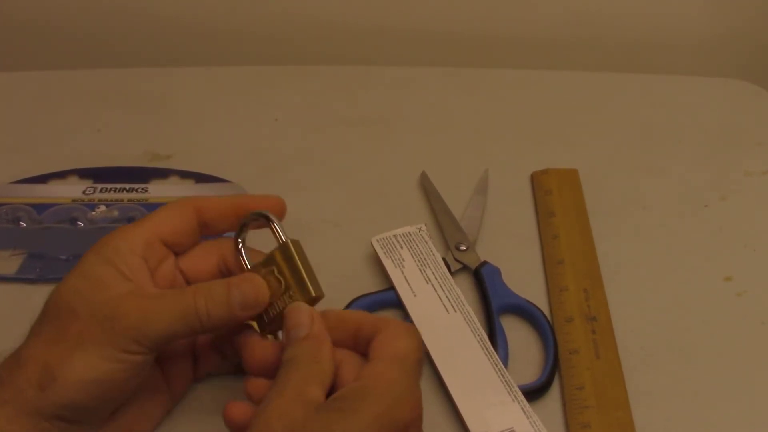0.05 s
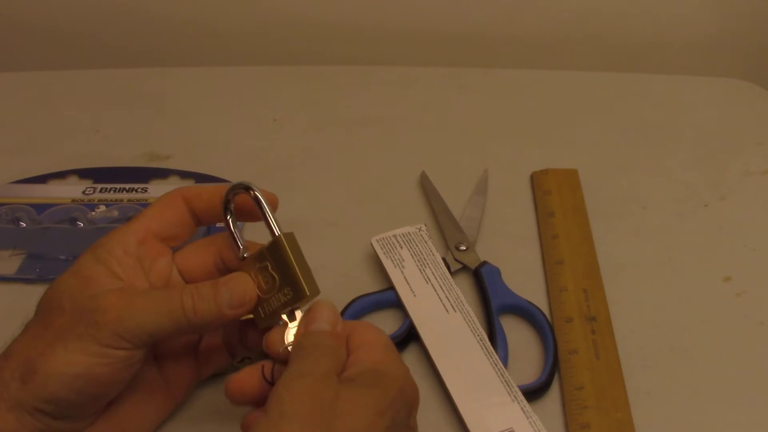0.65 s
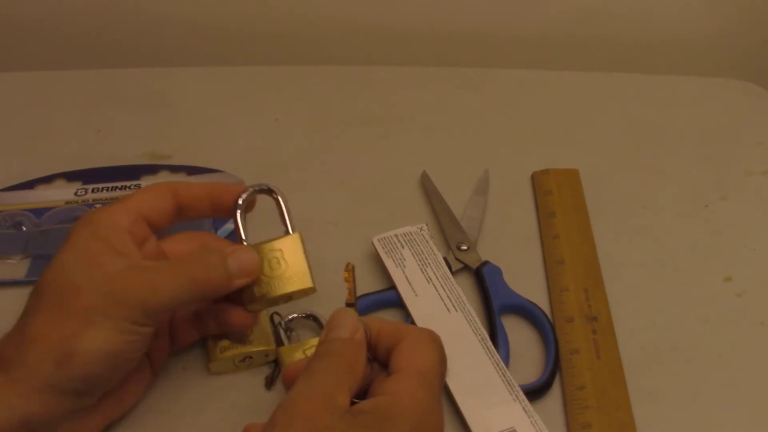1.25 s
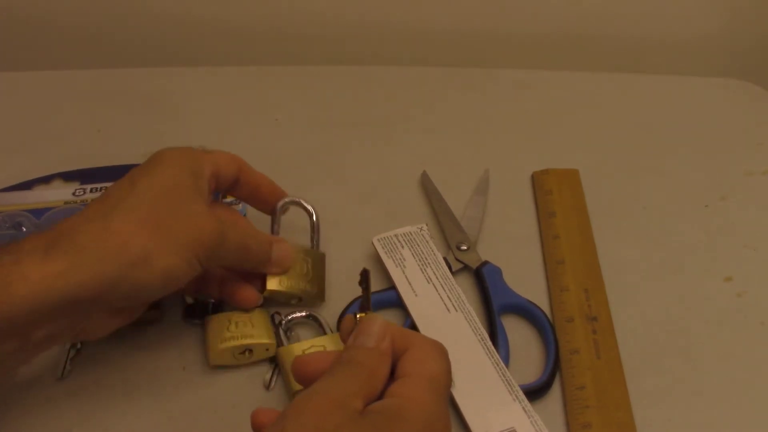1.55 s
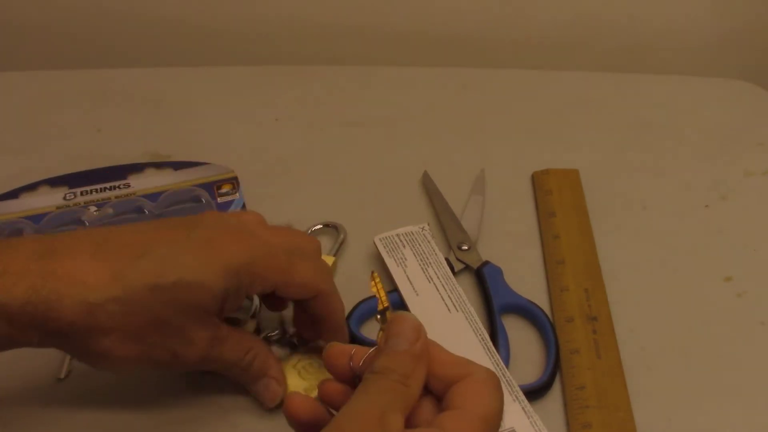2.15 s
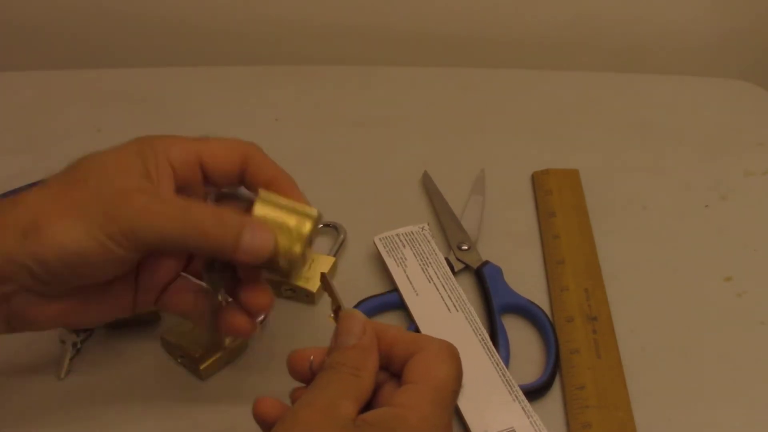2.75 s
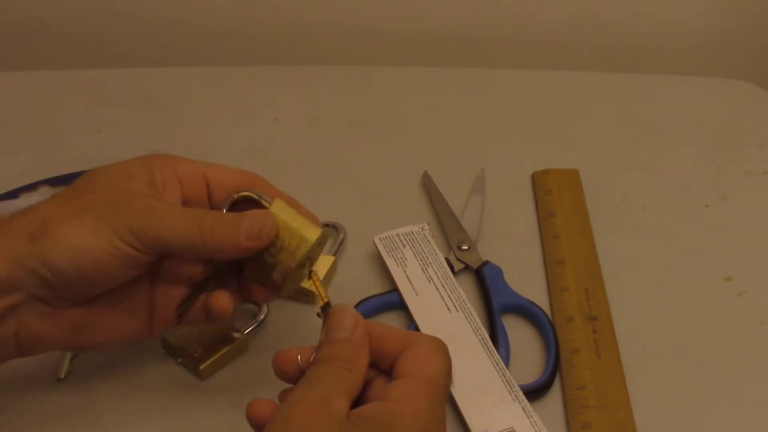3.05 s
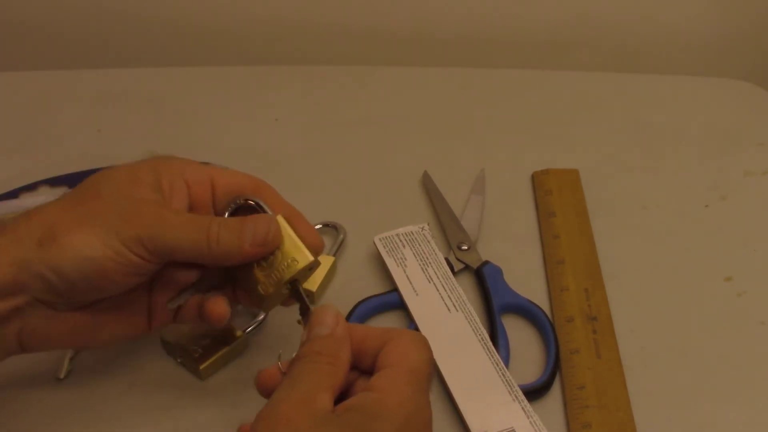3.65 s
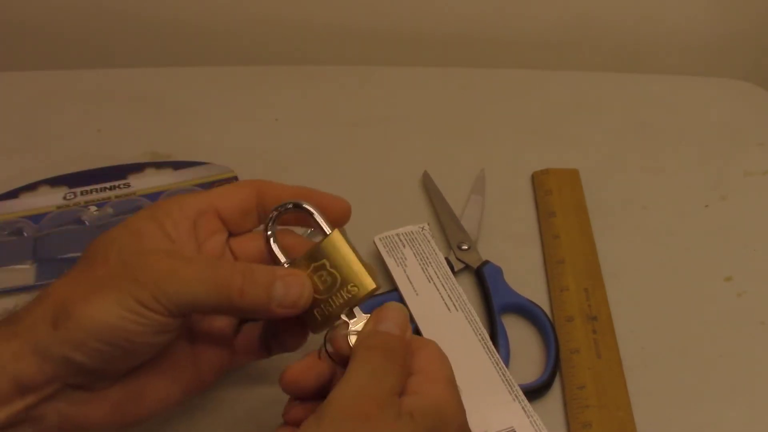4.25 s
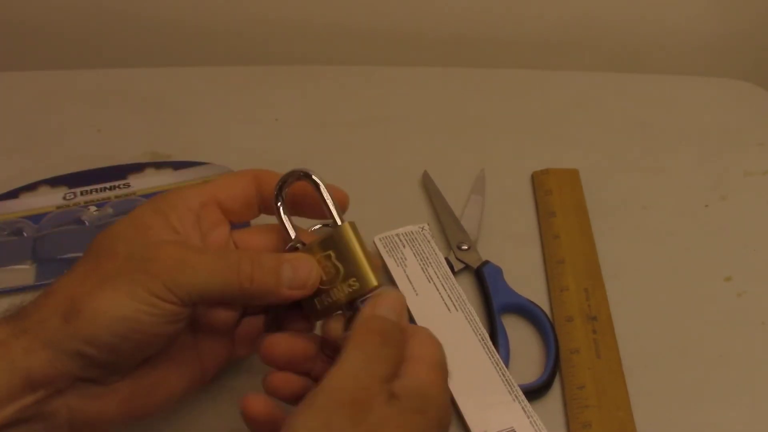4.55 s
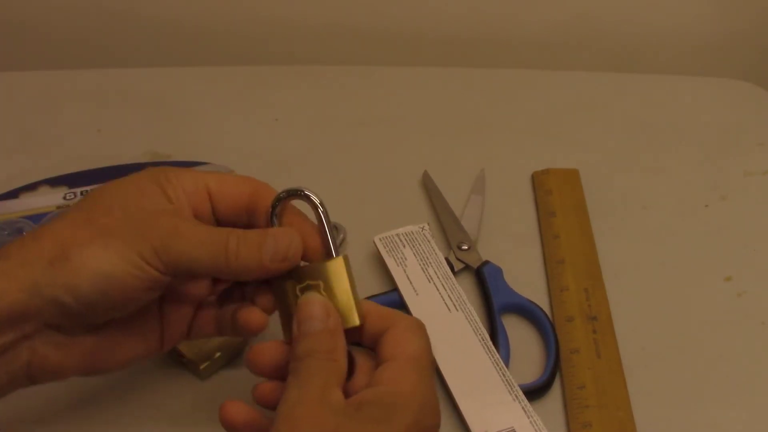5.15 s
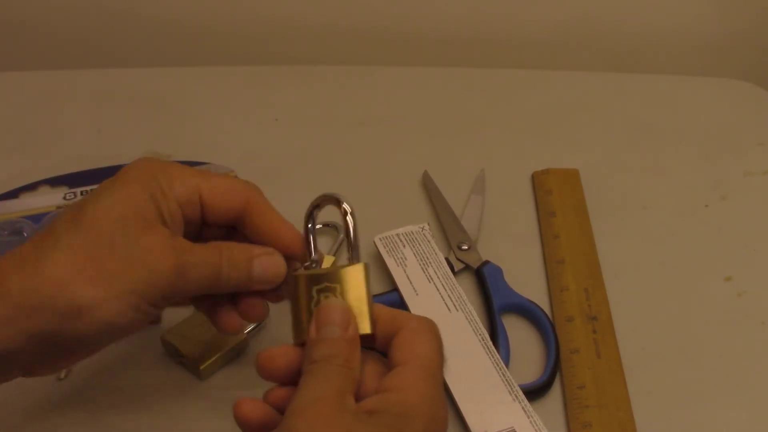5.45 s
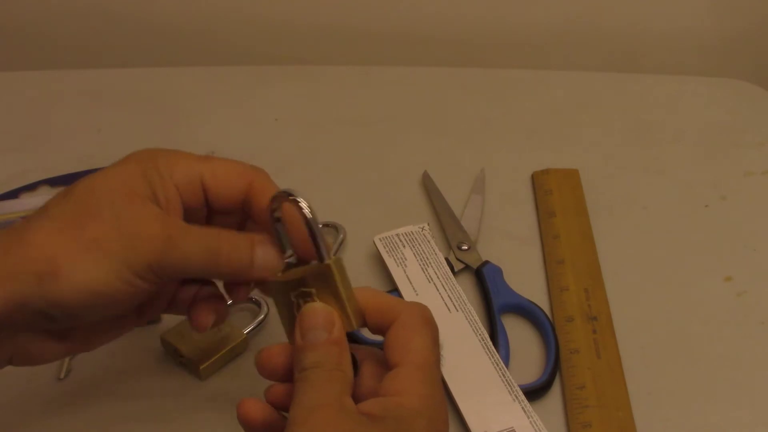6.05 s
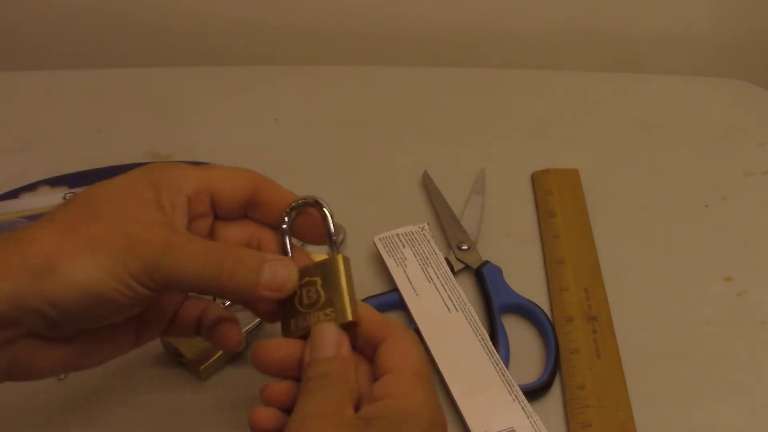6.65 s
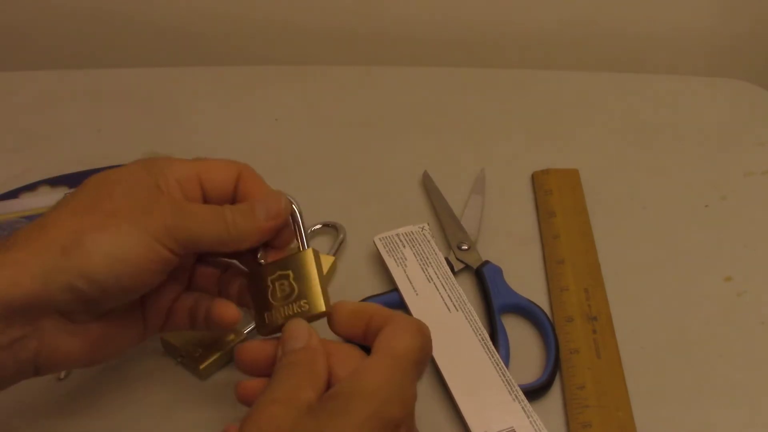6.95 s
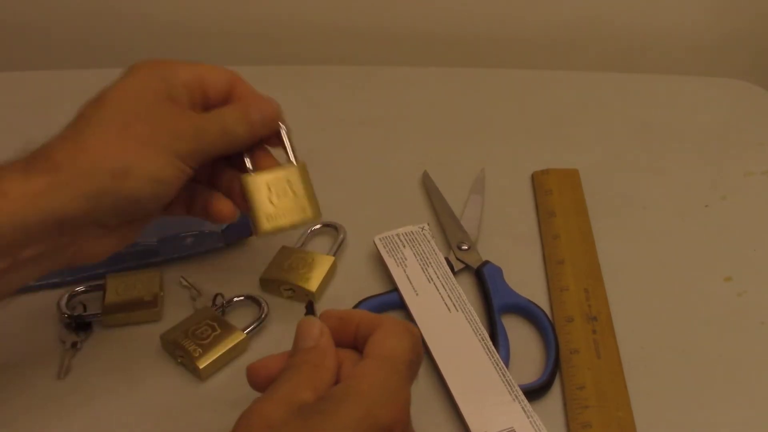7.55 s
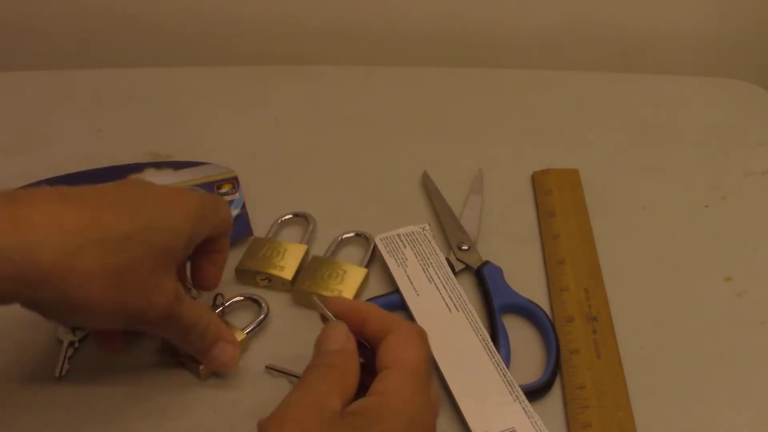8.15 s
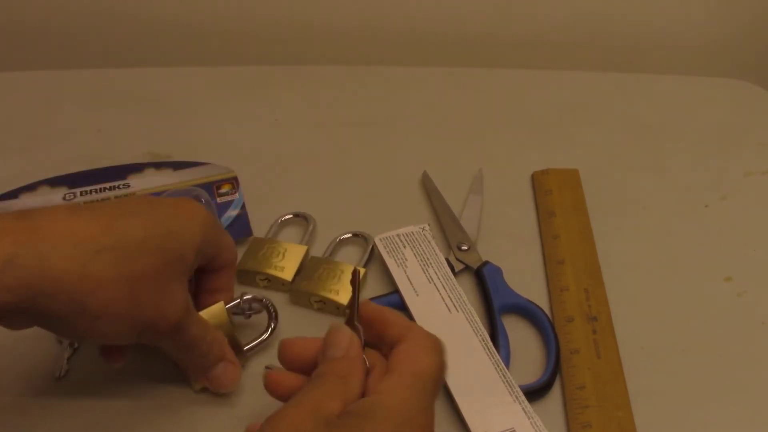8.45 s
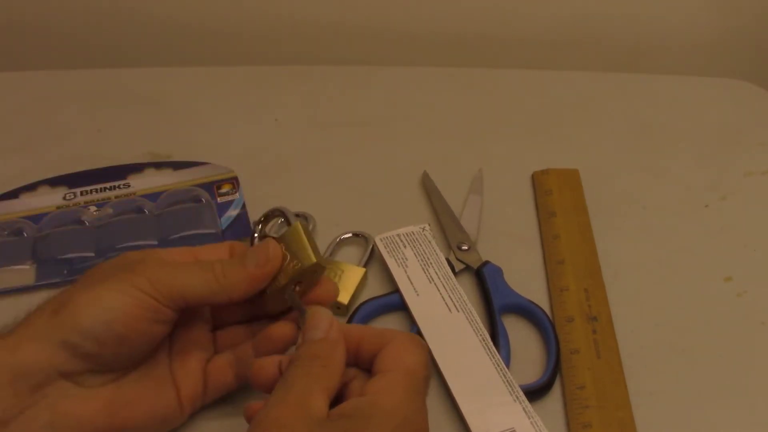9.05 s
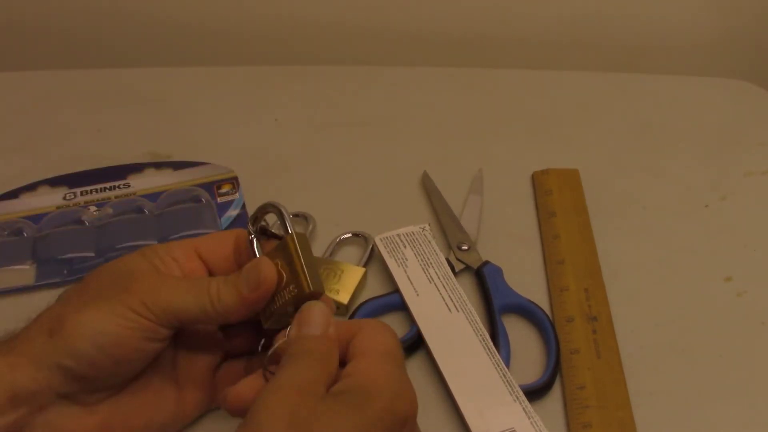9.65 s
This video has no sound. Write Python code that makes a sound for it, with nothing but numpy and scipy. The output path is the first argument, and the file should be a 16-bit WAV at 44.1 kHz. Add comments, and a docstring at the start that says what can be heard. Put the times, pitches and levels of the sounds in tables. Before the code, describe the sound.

Small brass padlocks and keys click, rasp and jingle in the hands, and clatter down on a hollow plastic table in a quiet room.

```python
"""Small brass padlocks are handled over a hollow plastic table, close to the microphone in a quiet room.
Shackles (the locks' loops) snap open and shut, and keys rasp in and out past the pins inside.
Locks are put down, rock to rest and are dragged, which makes the table top boom and clatter.
Fingers rub the brass, brass squeals once against steel, and the spare keys on the ring chime."""
import sys
import numpy as np
from scipy import signal
from scipy.io import wavfile
from scipy.ndimage import uniform_filter1d

SR = 44100
rng = np.random.default_rng(int(sys.argv[2]) if len(sys.argv) > 2 else 0)


def generate_wav(signal):
    """Clip the signal to [-1, 1] and save it as 16-bit WAV at the path in sys.argv[1]."""
    frames = np.transpose(np.atleast_2d(signal))
    scaled = np.clip(frames, -1, 1) * 32767
    pcm = np.round(scaled).astype(np.int16)
    wavfile.write(sys.argv[1], SR, pcm)


N = 436149
TIME = np.arange(N) / SR
BAND_EDGES_HZ = np.geomspace(28, 18000, 23)
BAND_HZ = np.sqrt(BAND_EDGES_HZ[1:] * BAND_EDGES_HZ[:-1])   # the middle of each band

# A key slides past the pins and clicks home. Each row: time of the click in seconds, click level in dB,
# seconds of rasp before it, seconds of rasp after it, rasp level in dB.
KEY_STROKES = [(.5137, 1, 0.011, 0.0035, -20.5), (0.7097, -50, 0.0017, 0.036, -44.5),
               (0.9609, -24, 0.011, 0.043, -33.5), (3.7797, -12.5, 0.036, 0.027, -32.5),
               (4.3624, 1, 0.014, 0.0033, -14.5), (4.5495, -24.5, 0.018, 0.039, -45),
               (4.7444, -23, 0.05, 0.035, -47.5), (5.43, -31.5, 0.0078, 0.013, -50),
               (6.0845, -28.5, 0.016, 0.055, -43), (7.3824, -20, 0.025, 0.015, -29),
               (9.348, -25.5, 0.023, 0.003, -37), (9.4656, -7, .017, 0.00088, -25.5),
               (9.7397, 3, .006, 0.0066, -9.5)]
# The tones at which the table top rings. Each row: pitch in Hz, level in dB.
TABLE_TONES = [(140, -14.5), (158, -10.5), (176, -8.5), (200, -13), (262, -18.5), (298, -1.5), (312, -1.5),
               (392, -12.5), (438, -1), (474, -5.5), (581, -14.5), (664, 0), (797, -2), (835, -7),
               (931, -18), (1001, -7), (1160, -14.5), (1330, -15), (1473, -14.5), (1743, -15.5), (1889, -8),
               (3438, -18), (3655, -17)]
# How long the table rings. Each row: frequency in Hz, seconds to fade by 60 dB (called "t60").
TABLE_T60 = [(100, 0.79), (300, 0.44), (700, 0.14), (1800, 0.19), (4800, 0.14), (13000, 0.19)]


def from_db(db):
    """Turn decibels into a factor to multiply a sound by."""
    return 10 ** (np.asarray(db) / 20)


def at_hz(rows, hz):
    """Read between rows of frequency and value, giving every octave equal room."""
    row_hz, values = np.transpose(rows)
    return np.interp(np.log(hz), np.log(row_hz), values)


def add(track, start_s, sound):
    """Mix a sound into a track at a given time."""
    at = int(round(start_s * SR))
    track[at:at + len(sound)] += sound[:N - at]


def highpass(sound, hz):
    """Turn down everything below a frequency."""
    return signal.sosfilt(signal.butter(2, hz, "high", fs=SR, output="sos"), sound + 1e-18)


def split_bands(pair):
    """Make one row for each frequency band, drawing on two signals in turn."""
    bands = []
    for k in range(len(BAND_HZ)):
        band = signal.butter(2, BAND_EDGES_HZ[k:k + 2], "band", fs=SR, output="sos")
        bands.append(signal.sosfilt(band, pair[k % 2] + 1e-18))
    return np.array(bands)


def band_gains(colour):
    """Band volumes that give white noise a tone colour at about the same power."""
    gains = from_db(at_hz(colour, BAND_HZ))
    return gains / np.sqrt(np.sum(gains ** 2 * np.diff(BAND_EDGES_HZ)) * 2 / SR)


def fade(t60, seconds):
    """Curves that die away, one for each t60."""
    return np.exp(-np.log(1000) * TIME[:int(seconds * SR)] / np.reshape(t60, (-1, 1)))


def ringing(tones, seconds):
    """One fading sine wave for each row of pitch in Hz, level in dB and t60."""
    hz, db, t60 = np.transpose(tones)
    waves = np.sin(2 * np.pi * hz[:, None] * TIME[:int(seconds * SR)])
    return from_db(db)[:, None] * fade(t60, seconds) * waves


def burst(noise, shape):
    """A random stretch of the noise bands, each shaped by its own volume curve."""
    start = rng.integers(N - shape.shape[1])
    return shape * noise[:, start:start + shape.shape[1]]


def tiny_slips(per_s, spread_db):
    """Friction as two streams of random ticks of uneven size."""
    slips = (rng.random((2, N)) < per_s / SR) * rng.choice([-1, 1], (2, N))
    slips = slips * from_db(spread_db * np.minimum(rng.exponential(1, (2, N)), 4))
    return slips / slips.std()


def wobble(smooth_s, depth_db):
    """A volume that wanders at random."""
    drift = uniform_filter1d(rng.standard_normal(N), int(smooth_s * SR))
    return from_db(depth_db * drift / drift.std())


def hand_move(start, end, rise_db_per_s, fall_db_per_s, swell_db=0):
    """The volume of one hand movement: it rises, holds (or swells or sags), then falls."""
    held = np.clip(TIME, start, end)
    drop_db = np.maximum(rise_db_per_s * (held - TIME), fall_db_per_s * (TIME - held))
    return from_db(swell_db * (held - start) / max(end - start, 1 / SR) - np.minimum(drop_db, 200))


def room_hush(noise):
    """The steady, low hush of a quiet room."""
    # The tone colour of the hush. Each row: frequency in Hz, level in dB.
    colour = [(15, -58), (25, -30.5), (43, -9.5), (66, -13), (84, -11), (175, -2), (270, -7.5), (301, -8.5),
              (962, -12.5), (1160, -14), (2480, -20.5), (4490, -24), (9070, -28.5), (14800, -35.5),
              (16000, -55.5)]
    return from_db(-55.5) * (band_gains(colour) @ noise)


def faint_hiss(noise):
    """A faint hiss whose wave is flipped between left and right."""
    # The tone colour of the hiss. Each row: frequency in Hz, level in dB.
    colour = [(100, 1.5), (1000, 4), (4000, -11.5), (10000, -22), (14000, -6), (16000, -17.5)]
    return from_db(-64) * (band_gains(colour) @ np.roll(noise, N // 2, axis=1)) * [[1], [-1]]


def lock_clicks(noise, level_db=-2.5, body_boost_db=10, snap_t60=.013, ring_db=-23.5, ring_t60=.13):
    """Fingers damp the brass, so a click is a hard snap with hardly any ring."""
    # A latch, a shackle or another lock hits metal.
    # Each row: time in seconds, level of the high snap in dB, level of the lower body sound in dB.
    clicks = [(.4562, -39, -39), (1.098, -20, -26), (1.119, -17.5, -32), (2.102, -17.5, -28),
              (2.315, -25.5, -31), (2.864, -32, -41), (3.0991, -36, -32), (3.7645, -18, -42),
              (3.7955, -49, -19.5), (3.8586, -35, -40), (4.2431, -39.5, -39), (4.2873, -32, -46.5),
              (4.3042, -32.5, -40), (4.568, -32, -33), (5.08, -30, -37.5), (5.2082, -41, -38.5),
              (5.4829, -40.5, -49), (6.071, -36, -48), (6.2444, -33.5, -55.5), (6.4382, -1.5, -0.5),
              (6.4632, -5.5, -17), (7.3397, -41, -40.5), (7.956, -9, -30), (7.968, -5, -35),
              (9.1798, -36.5, -33.5), (9.281, -34, -49), (9.301, -29.5, -42), (9.699, -38, -38)]
    # The tone colour of a click. Each row: frequency in Hz, level in dB.
    colour = [(40, -30), (250, -13.5), (800, -8.5), (1400, -10.5), (2600, -5), (4000, -4), (6000, -2),
              (8500, 3), (11000, -2.5), (13000, -10.5), (16000, -13.5)]
    # Keys click too; the lock's body follows only part of a change in their strength.
    key_clicks = [(s, db, -16.5 + .656 * db) for s, db, *_ in KEY_STROKES]
    shape = (fade(snap_t60, .1) + from_db(ring_db) * fade(ring_t60, .1)) * band_gains(colour)[:, None]
    out = np.zeros(N)
    for s, snap_db, body_db in key_clicks + clicks:
        force = [(2800, body_db + body_boost_db), (6000, snap_db)]
        add(out, s, from_db(level_db + at_hz(force, BAND_HZ)) @ burst(noise, shape))
    return out


def key_rasps(level_db=-1.7, ramp_s=.008):
    """The teeth of a key flick the pins in a quick, uneven run."""
    # The tone colour of the rasp. Each row: frequency in Hz, level in dB.
    colour = [(40, -40.5), (900, -14.5), (1700, -9.5), (2700, -2), (4200, -7), (7500, 0.5), (10500, 0.5),
              (13000, -23), (16000, -8.5)]
    push = np.zeros(N)
    for s, _, before, after, db in KEY_STROKES:
        inside_s = np.minimum(TIME - s + before, s + after - TIME)
        push += from_db(db) * np.clip(inside_s / ramp_s, 0, 1)
    flicks = tiny_slips(per_s=1100, spread_db=-1.5) * push
    return from_db(level_db) * (band_gains(colour) @ split_bands(flicks))


def brass_ring(contacts, level_db):
    """Every contact also makes the lock itself ring very briefly."""
    # Where a hand-held lock and its shackle ring. Each row: pitch in Hz, width in Hz, level in dB.
    resonances = [(3586, 1500, -6), (6195, 1700, 2), (10310, 98, -8.5), (11300, 590, 7.5)]
    out = contacts.copy()
    for hz, width, db in resonances:
        peak = signal.iirpeak(hz, hz / width, fs=SR)
        out += from_db(db + level_db) * signal.lfilter(*peak, contacts + 1e-18)
    return out


def table_ring(seconds, tuning=1):
    """The table top's tones, every second one flipped; the low ones last longest."""
    # The weight of the locks cuts the ring short. Each row: frequency in Hz, longest t60 in seconds.
    longest = [(300, .25), (450, .19), (1000, .18), (2000, .12), (3500, .09)]
    tones = [(hz * tuning, db, min(at_hz(TABLE_T60, hz), at_hz(longest, hz))) for hz, db in TABLE_TONES]
    return ringing(tones, seconds) * (-1) ** np.arange(len(tones))[:, None]


def lock_drags(scrape_db=-7.5, ring_db=-10):
    """A sliding lock catches and slips on the grain of the table, shaking the top."""
    # A lock slides. Each row: start in seconds, end in seconds, level in dB, swell on the way in dB.
    slides = [(1.057, 1.142, -20.5, 1.5), (2.075, 2.113, -27.5, -12), (2.156, 2.324, -16.5, -19),
              (2.49, 2.49, -12, 2), (6.472, 6.492, -11.5, -1.5), (6.57, 6.662, -17, -5),
              (7.902, 7.994, -18.5, -6), (8.137, 8.211, -28, -5.5), (8.304, 8.447, -28.5, 2.5),
              (8.512, 8.605, -24, 1), (8.738, 9.28, -49, 0.5)]
    # The tone colour of the scrape. Each row: frequency in Hz, level in dB.
    colour = [(40, -33), (110, -9.5), (170, 0), (240, -7), (320, -9.5), (520, -1.5), (800, 7), (1500, -3),
              (2600, -10.5), (3700, -13.5), (5200, -25), (10000, -28), (15000, -52.5)]
    catching = wobble(smooth_s=.0045, depth_db=3)
    push = sum(from_db(db) * hand_move(start, end, rise_db_per_s=903, fall_db_per_s=307, swell_db=swell)
               for start, end, db, swell in slides)
    slips = tiny_slips(per_s=1100, spread_db=2) * catching * push
    scrape = band_gains(colour) @ split_bands(slips)
    ring = highpass(table_ring(.5).sum(axis=0), hz=485)   # tiny slips barely move the lowest tones
    shaken = signal.fftconvolve(slips[0], ring / np.linalg.norm(ring))[:N]
    return from_db(scrape_db) * scrape + from_db(ring_db) * shaken


def rocking_touches(gap_shrink=.82, harder_per_touch=.12):
    """As a lock rocks to rest, each touch comes sooner and lands nearer a hard corner."""
    # A lock lands. Each row: start in seconds, strength in dB, hardness (0 flat face, 1 corner),
    # number of touches, first gap in seconds, change per touch in dB.
    landings = [(1.058, -13, 0.12, 2, .008, 0), (1.095, -7, .66, 2, 0.03, -1.5),
                (1.32, -27.5, 0.68, 2, 0.0076, -6.5), (1.436, -24.5, 0.68, 2, 0.057, -8.5),
                (1.567, -24.5, 0.25, 2, 0.014, 15), (1.628, 2, 0.35, 3, 0.029, -1.5),
                (1.728, -4.5, 0.23, 1, 0, 0), (1.801, -14, 0.17, 2, 0.029, -6), (1.899, -12, 0.4, 1, 0, 0),
                (2.015, -41, 0, 2, 0.0091, 12.5), (2.104, -14.5, 0.48, 2, .029, 3),
                (2.17, -9.5, 0.67, 2, 0.054, -9), (2.294, -15, 0.57, 3, 0.016, -0.5),
                (2.392, -31, 0.16, 1, 0, 0), (2.495, -11, 1, 2, 0.0085, 1.5),
                (2.601, -3, 0.66, 3, 0.019, -3.5), (6.439, -4, 0.76, 1, 0.012, 0),
                (6.447, 4, 0.77, 2, 0.024, -5.5), (6.498, -7.5, 0.7, 2, .02, -1.5),
                (6.587, -7.5, 0.94, 2, .006, 3.5), (6.629, -11.5, 0.93, 2, .038, -0.5),
                (6.705, -10.5, 0.83, 1, 0, 0), (6.793, -30.5, .45, 1, 0, 7),
                (7.777, -4.5, 0.034, 2, .021, 0), (7.929, -11, 0.015, 2, .027, 7.5),
                (7.967, 0.5, 0.29, 2, 0.028, -0.5), (8.062, -5.5, 0.36, 2, 0.014, 8),
                (8.126, -13, 0.38, 2, 0.12, -13.5), (8.368, -26, 0.36, 1, 0, 0),
                (8.509, -26, .05, 2, 0.023, -5), (8.61, -17, 0.55, 2, 0, -1),
                (8.727, -27, 0.46, 1, 0.029, 0), (8.831, -32.5, 0.5, 2, .055, 3.5),
                (9.113, -36, 0.35, 2, 0.037, -0.5), (9.23, -31, 0.53, 1, 0, 0)]
    for s, db, hardness, count, gap, change_db in landings:
        for k in range(count):
            yield s, db + k * change_db, np.clip(hardness + k * harder_per_touch, 0, 1)
            s += gap * gap_shrink ** k


def blow_force(db, hardness):
    """A blow as rows of Hz and dB: a flat face booms, a corner rings the shackle and sounds sharp."""
    boom_db = np.interp(hardness ** 2, [0, 1], [8, -30.5])
    shackle_db = 10.5 * hardness
    edge_db = np.interp((1 - hardness) ** 2, [0, 1], [-16.5, -36.5])
    return [(460, db + boom_db), (740, db), (2000, db), (3700, db + shackle_db), (7500, db + edge_db)]


def table_knocks(noise, tones_db=-13, wash_db=-10.5, crack_db=-3, crack_t60=.025, scatter_db=2):
    """Each blow gives a short crack, the top's strong tones and a wash of its many crowded ones."""
    # The tone colour of the crack and wash. Each row: frequency in Hz, level in dB.
    colour = [(40, -25.5), (100, -21), (170, 0.5), (240, -4), (400, 2.5), (800, 7.5), (1500, 0.5),
              (2600, -11), (3700, -14.5), (5000, -8), (8000, 0.5), (11000, -12), (15000, -28)]
    length_s, rise_s = .5, .0007
    tone_hz = np.array(TABLE_TONES)[:, 0]
    # The weight of locks and hands retunes the top a little from blow to blow.
    rings = [table_ring(length_s, tuning) for tuning in (.98, .993, 1.007, 1.02)]
    wash = from_db(wash_db) * fade(at_hz(TABLE_T60, BAND_HZ), length_s)
    crack = from_db(crack_db) * fade(crack_t60, length_s)
    shape = (wash + crack) * band_gains(colour)[:, None]
    build_up = 1 - np.exp(-TIME[:shape.shape[1]] / rise_s)   # full force takes a moment
    out = np.zeros(N)
    for s, db, hardness in rocking_touches():
        force = blow_force(db, hardness)
        clatter = from_db(at_hz(force, BAND_HZ)) @ burst(noise, shape)
        scatter = scatter_db * rng.standard_normal(len(tone_hz))
        tones = from_db(at_hz(force, tone_hz) + tones_db + scatter) @ rings[rng.integers(len(rings))]
        add(out, s, (clatter + tones) * build_up)
    return out


def finger_rubs(noise, murmur_db=-2, brush_db=-2.5):
    """Skin slides on brass: a soft, low murmur and a faint brushing that follows the changing grip."""
    # Fingers shift. Each row: start in seconds, end in seconds, murmur in dB, brushing in dB.
    rubs = [(2.36, 2.47, -47, -53), (2.81, 3.052, -59.5, -66), (3.855, 4.42, -55.5, -57),
            (4.617, 4.69, -56.5, -55), (4.956, 5.278, -61, -58), (6.87, 7.301, -53.5, -60),
            (8.7, 9.29, -56, -59.5), (9.35, 9.68, -53, -55), (9.881, 9.89, -60, -41)]
    # The tone colour of the murmur. Each row: frequency in Hz, level in dB.
    colour = [(100, -30.5), (200, -10), (300, 1), (450, -12), (1000, -19), (3000, -38)]
    moves = [hand_move(start, end, rise_db_per_s=251, fall_db_per_s=94) for start, end, *_ in rubs]
    murmur_volume, brush_volume = from_db([levels for _, _, *levels in rubs]).T @ np.array(moves)
    murmur = band_gains(colour) @ noise[:, ::-1]
    grip = wobble(smooth_s=.033, depth_db=-5)
    brush = highpass(tiny_slips(per_s=4300, spread_db=6)[0], hz=3450) * grip
    brush = signal.lfilter([.5, .5], [1], brush)   # soft skin dulls the highest treble
    return from_db(murmur_db) * murmur_volume * murmur + from_db(brush_db) * brush_volume * brush


def brass_squeal():
    """Brass sticks and slips on steel, which keeps a few high tones going for a moment."""
    # The rise and fall of the squeal. Each row: time in seconds, level in dB.
    outline = [(2.512, -49), (2.52, -17), (2.533, -16), (2.539, -23), (2.56, -55)]
    # The squealing tones. Each row: pitch in Hz, blur of that pitch in Hz, level in dB.
    tones = [(7500, 180, -6.5), (8160, 39, -4), (9480, 120, -4.5), (11000, 200, -12.5), (13500, 150, -6),
             (15300, 10, 3)]
    out = np.zeros(N)
    for hz, blur_hz, db in tones:
        wander = np.cumsum(rng.standard_normal(N)) * np.sqrt(2 * np.pi * blur_hz / SR)
        out += from_db(db) * np.sin(2 * np.pi * hz * TIME + wander)
    times, levels_db = np.transpose(outline)
    sounding = (TIME >= times[0]) & (TIME <= times[-1])
    return out * from_db(np.interp(TIME, times, levels_db)) * sounding


def key_chimes(level_db=-2, rattle_s=.025, per_touch_db=-14, scatter_db=3.5, tick_db=-5.5, tick_t60=.019):
    """Hanging keys tick together, ring and touch twice more, with a new mix of tones each time."""
    # The spare keys swing together. Each row: start in seconds, level in dB, leading pitch in Hz.
    swings = [(2.5333, -20.5, 15300), (2.6244, -39, 15300), (2.6703, -30.5, 8000), (2.762, -42.5, 9450),
              (2.836, -47, 9300), (2.864, -38, 6250), (2.9412, -49, 9900), (3.856, -37.5, 6250),
              (4.156, -24, 9450), (4.3645, -28, 9450), (4.7449, -33.5, 8000), (5.0809, -33, 6220),
              (5.234, -43, 8100), (6.1299, -47, 9450), (6.4645, -19, 15300), (6.4938, -19, 9450),
              (9.7426, -11, 9450)]
    # The tones of a key. Each row: pitch in Hz, level in dB, seconds to fade by 60 dB.
    tones = [(2582, 0, .085), (5911, -10.5, .16), (6250, -8, .18), (6620, -11, .13), (8010, 0, .17),
             (9441, -3, .17), (9455, -5, .17), (12770, -6, .18), (13560, -15, .16), (15265, -1, .19)]
    length_s, lead_octaves, other_tones_db = .4, .077, -10.5
    rings = ringing(tones, length_s)
    tone_hz = np.array(tones)[:, 0]
    tick_band = signal.butter(2, [4000, 11500], "band", fs=SR, output="sos")
    tick_fade = fade(tick_t60, length_s)[0]
    out = np.zeros(N)
    for s, db, lead_hz in swings:
        near_lead = np.exp(-(np.log2(tone_hz / lead_hz) / lead_octaves) ** 2)
        mix_db = level_db + db + other_tones_db * (1 - near_lead)
        gaps = rattle_s * rng.uniform(.18, 1.1, size=2)
        for touch, delay in enumerate([0, *np.cumsum(gaps)]):
            strengths = from_db(mix_db + touch * per_touch_db + scatter_db * rng.standard_normal(len(tones)))
            tick = signal.sosfilt(tick_band, rng.standard_normal(len(tick_fade))) * tick_fade
            add(out, s + delay, strengths @ rings + from_db(tick_db) * np.linalg.norm(strengths) * tick)
    return out


def room_echo(sound, noise, echo_db, side_db, rise_s):
    """Near walls answer within a few milliseconds, almost alike on the left and right."""
    # How long the room rings. Each row: frequency in Hz, seconds to fade by 60 dB.
    room_t60 = [(200, 0.21), (2500, 0.13), (7000, 0.076), (14000, 0.028)]
    size = int(.3 * SR)
    shape = fade(at_hz(room_t60, BAND_HZ), .3) * np.clip(TIME[:size] / rise_s, 0, 1) ** 2
    middle, side = (np.sum(shape * noise[:, k * size:(k + 1) * size], axis=0) for k in range(2))
    echo = (middle + from_db(side_db) * side * [[1], [-1]]) / np.linalg.norm(middle)
    return sound + from_db(echo_db) * signal.fftconvolve(sound[None], echo, axes=1)[:, :N]


def microphone_housing(sound, treble_hz=2200, delay_s=.00029, delayed_db=-19, lean_left_db=1.1):
    """The microphone's housing colours the treble a little differently at its two openings."""
    treble = highpass(sound.mean(axis=0), treble_hz)
    delayed = np.interp(TIME - delay_s, TIME, treble)
    side = from_db(delayed_db) * delayed + (from_db(lean_left_db) - 1) / 2 * treble
    return sound + side * [[1], [-1]]


def scene():
    """Table sounds and hand-held metal in the room, over a steady hush."""
    noise = split_bands(rng.standard_normal((2, N)))
    table = highpass(table_knocks(noise) + lock_drags(), hz=115)
    table = brass_ring(table, level_db=-4)
    table = room_echo(table, noise, echo_db=-16, side_db=-27, rise_s=.0067)
    locks = brass_ring(lock_clicks(noise) + key_rasps(), level_db=-9.5)
    locks = room_echo(locks, noise, echo_db=-11.5, side_db=-18, rise_s=.009)
    handling = table + locks + key_chimes() + brass_squeal() + finger_rubs(noise)
    return microphone_housing(handling) + room_hush(noise) + faint_hiss(noise)


def record(dry):
    """The loudest blows overload the recorder and are squashed; the highest treble is cut."""
    ceiling, cutoff_hz = .87, 16100
    squashed = dry / (1 + (dry / ceiling) ** 4) ** (1 / 4)
    return signal.sosfilt(signal.ellip(10, .2, 70, cutoff_hz, fs=SR, output="sos"), squashed)


dry = scene()
out = record(dry)
generate_wav(out)
```